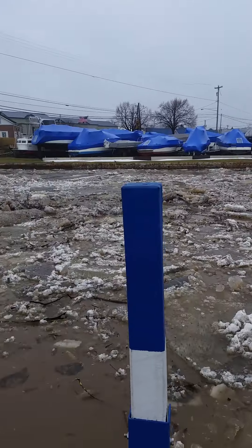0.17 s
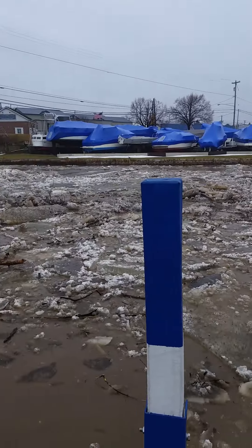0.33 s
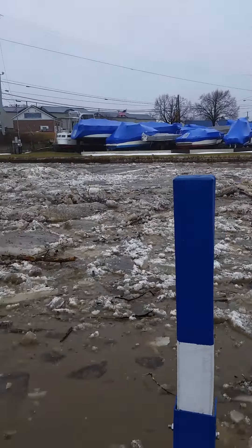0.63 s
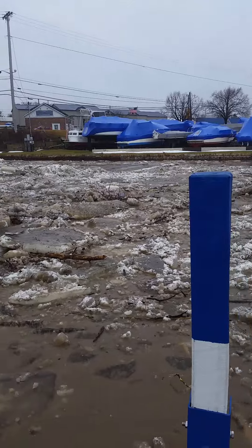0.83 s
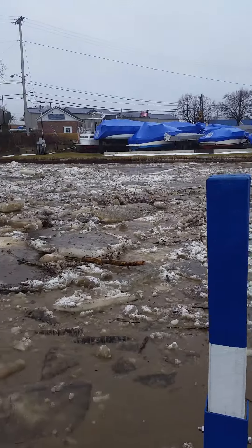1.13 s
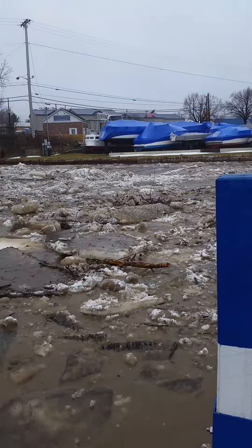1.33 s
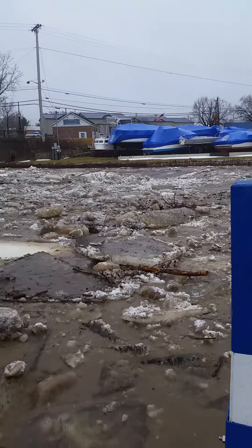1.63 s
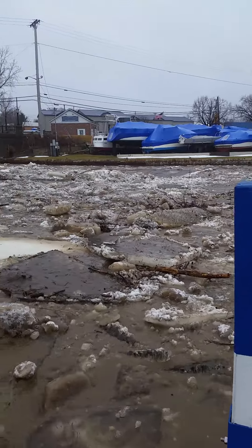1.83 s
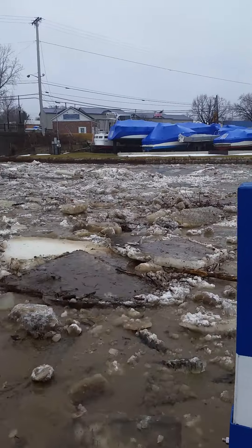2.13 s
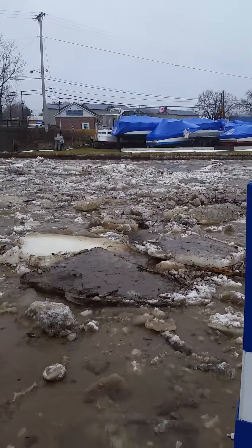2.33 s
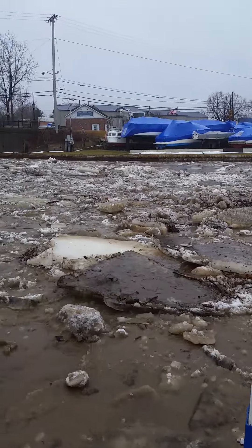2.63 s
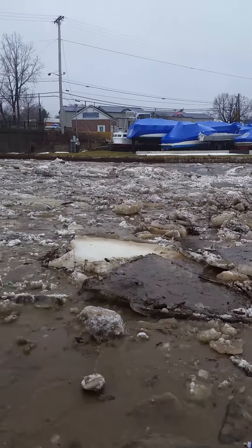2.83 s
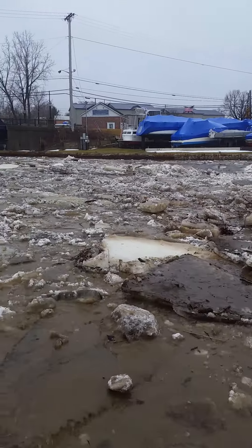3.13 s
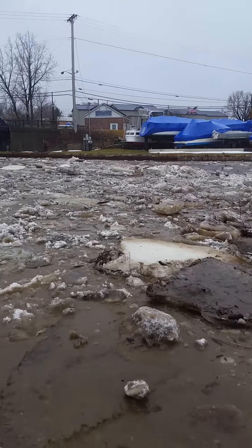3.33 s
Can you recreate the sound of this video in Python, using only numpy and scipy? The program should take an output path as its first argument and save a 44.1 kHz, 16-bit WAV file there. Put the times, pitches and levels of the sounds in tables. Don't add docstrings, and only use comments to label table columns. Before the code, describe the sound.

River ice drifting past with slushy hiss, ticks and a deep thud, under rumbling wind gusts

```python
import sys
import numpy as np
from scipy import signal
from scipy.fft import rfft, irfft, next_fast_len
from scipy.io import wavfile
from scipy.ndimage import uniform_filter1d

SR = 44100
rng = np.random.default_rng(int(sys.argv[2]) if len(sys.argv) > 2 else 0)


def amplitude_ratio(level_db):
    exponent = np.asarray(level_db, float) / 20
    return 10 ** exponent


def bounce(signal):
    frames = np.transpose(np.atleast_2d(signal))
    limited = np.clip(frames, -1, 1)
    pcm = np.round(limited * 32767).astype(np.int16)
    wavfile.write(sys.argv[1], SR, pcm)


N = 153909


def evened(x):
    return x / np.sqrt(np.mean(x ** 2) + 1e-20)


def read(points, hz):
    f, value = np.transpose(points)
    return np.interp(np.log(hz + 1), np.log(f + 1), value)


def curve(points, t):
    return np.interp(t, *np.transpose(points))


def add(mix, s, sound):
    part = mix[..., round(s * SR):][..., :sound.shape[-1]]
    part += sound[..., :part.shape[-1]]


def colour(x, points, lag_s=0.):
    size = next_fast_len(len(x) + 2048)
    hz = np.fft.rfftfreq(size, 1 / SR)
    delay = np.exp(-2j * np.pi * hz * lag_s)
    return irfft(rfft(x, size) * amplitude_ratio(read(points, hz)) * delay, size)[:len(x)]


def resonate(x, hz, width):
    r = np.exp(-np.pi * width / SR)
    return 2 * signal.lfilter([1 - r], [1, -r * np.exp(2j * np.pi * hz / SR)], x).real


def slow(seconds, count):
    span = max(int(seconds * SR), 1)
    smooth = uniform_filter1d(rng.standard_normal(count), span)
    return evened(uniform_filter1d(smooth, span))


# pitch in Hz, likeness (1 is identical).
LIKENESS = [(100, 0.7), (700, 0.84), (1500, 0.95), (3000, 0.77), (6000, 0.04), (15000, 0.092)]


def hiss():
    patch_db, flicker_db = 1.0, 1.5
    frames, hz = N // 64 + 5, np.fft.rfftfreq(256, 1 / SR)
    a, b, c, d, patches = rng.standard_normal((frames, 129, 5)).T
    patches = evened(uniform_filter1d(uniform_filter1d(patches, 5, 0), 40, 1))
    flicker = evened(uniform_filter1d(rng.standard_normal(frames), size=7))
    same = np.clip(read(LIKENESS, hz), -1, 1)[:, None]
    left = a + 1j * b
    right = same * left + np.sqrt(1 - same ** 2) * (c + 1j * d)
    z = np.array([left, right]) * amplitude_ratio(patch_db * patches + flicker_db * flicker)
    return evened(signal.istft(z, nperseg=256, noverlap=192)[1][:, :N])


def grains(per_s, low_hz, top_hz, cycles):
    spread_db = 3.6
    happens = rng.random(N) < per_s / SR
    size = amplitude_ratio(spread_db * np.minimum(rng.exponential(1, N), 3.5)) * happens
    kind, out = rng.integers(0, 24, N), np.zeros(N)
    for k, hz in enumerate(np.geomspace(low_hz, top_hz, 24)):
        u = np.arange(0, 4 * cycles * SR / hz) * hz / SR
        ring = np.sin(2 * np.pi * u) * np.exp(-u / cycles)
        out += signal.oaconvolve(size * (kind == k), ring)[:N]
    return evened(out)


# time in seconds, level in dB.
FLOW_LEVEL = [(0, -45), (.35, -43), (.6, -45), (1.1, -42), (1.44, -39.5), (1.52, -35.5), (1.7, -34.5),
              (1.95, -34), (2.15, -36.5), (2.6, -38), (2.9, -36), (3.49, -38)]
# pitch in Hz, level in dB per Hz.
RIVER_COLOUR = [(60, 8.5), (300, -3), (900, -6.5), (1700, -8.5), (3000, -13), (5000, -19.5), (9000, -18.5),
                (16000, -23)]


def river():
    level_db, crackle_db, clink_db = 3, -11, -11
    crackle = np.array([grains(900, 2320, 20000, cycles=1.0) for port in range(2)])
    body = hiss() + amplitude_ratio(crackle_db) * crackle
    body = evened(np.array([colour(x, RIVER_COLOUR) for x in body]))
    body = body + amplitude_ratio(clink_db) * grains(200, 337.6, 1800, cycles=6.0)
    return body * amplitude_ratio(level_db + curve(FLOW_LEVEL, np.arange(N) / SR))


# time in seconds, level in dB.
WIND_LEFT = [(0, -19), (.15, -33), (.5, -24), (.65, -34), (.9, -27), (1.2, -22.5), (1.35, -25),
             (1.6, -19.5), (1.8, -27.5), (2.1, -20), (2.4, -31), (2.6, -34.5), (2.9, -26.5), (3.1, -29.5),
             (3.49, -35)]
WIND_RIGHT = [(0, -7), (.2, -10), (.3, -16.5), (.45, -14), (.6, -14.5), (.75, -30), (.95, -23),
              (1.05, -12.5), (1.15, -18.5), (1.4, -16.5), (1.7, -16.5), (2.1, -14.5), (2.45, -20),
              (2.6, -21.5), (2.75, -34), (2.95, -31.5), (3.05, -23), (3.49, -26)]
# pitch in Hz, level in dB per Hz.
WIND_COLOUR = [(15, -36), (40, -10.5), (75, -0.5), (180, -4), (260, -6.5), (400, -21.5), (800, -32),
               (2000, -54)]


def wind_on_port(gust):
    full_db, dull_db_per_octave = -3, 0.73
    lump_db, lump_s = 1.5, 0.025
    frames, hz = N // 256 + 5, np.fft.rfftfreq(1024, 1 / SR)
    a, b = rng.standard_normal((frames, 513, 2)).T
    short_db = curve(gust, np.arange(frames) * 256 / SR) - full_db
    octaves = np.log2(np.maximum(hz, 100) / 100)[:, None]
    shape = amplitude_ratio(read(WIND_COLOUR, hz)[:, None] + dull_db_per_octave * octaves * short_db)
    x = signal.istft((a + 1j * b) * shape, nperseg=1024, noverlap=768)[1][:N]
    lumpy = evened(x) * amplitude_ratio(lump_db * np.tanh(slow(lump_s, N)))
    return evened(lumpy) * amplitude_ratio(curve(gust, np.arange(N) / SR))


def wind():
    return np.array([wind_on_port(WIND_LEFT), wind_on_port(WIND_RIGHT)])


# middle in seconds, peak level in dB, pitch in Hz, port (0 left, 1 right).
EDDIES = [(0.142, -9.5, 171, 0), (0.217, -11.5, 114, 0), (0.483, -16, 140, 0), (1.235, -24, 90, 0),
          (1.3, -9, 122, 0), (1.58, -8, 137, 0), (1.689, -14, 109, 0), (1.986, -12, 122, 0),
          (2.12, -29, 120, 0), (2.175, -8, 151, 0), (2.935, -11.5, 156, 0), (3.394, -8.5, 93.5, 1),
          (3.414, -12.5, 197, 1), (2.285, -4, 136, 1), (3.179, -12, 78, 1), (.007, 0, 160, 1),
          (.016, -3, 150, 1), (.074, -7.5, 118, 1), (0.101, -7.5, 188, 1), (0.166, -3, 75, 1),
          (0.388, -2.5, 124, 1), (0.421, -8, 172, 1), (0.438, -2.5, 148, 1), (.572, -8, 84, 1),
          (1.063, -4.5, 106, 1), (2.165, -9, 174, 1), (1.035, -4.5, 117, 1), (1.697, -4, 98, 1),
          (1.801, -2, 87, 1), (2.088, -2.5, 91, 1), (2.409, -5.5, 80, 1), (2.443, -6.5, 81, 1)]


def puffs():
    cycles = 0.55
    out, t = np.zeros((2, N)), np.arange(-1500, 1500) / SR
    for s, db, hz, port in EDDIES:
        push = np.exp(-(t * hz / cycles) ** 2) * np.cos(2 * np.pi * hz * t + 0.22)
        add(out[int(round(port))], s + t[0], amplitude_ratio(db) * push)
    return out


# start in
# seconds, peak level in dB, pitch in Hz, time to fade by 60 dB in seconds.
CHUNK_TAPS = [(.609, -35.5, 666, 0.14), (0.609, -35, 920, 0.12), (.611, -37, 1380, 0.096),
              (.748, -19.5, 244, 0.08), (.772, -25.5, 271, 0.072), (.875, -36.5, 675, .1),
              (1.097, -32, 1800, .03), (1.096, -34, 524, 0.11), (1.115, -30, 552, 0.11),
              (1.135, -23.5, 548, .1), (1.149, -23.5, 547.6, 0.15), (1.19, -27, 315, 0.059),
              (1.148, -24, 1010, 0.033), (1.474, -16.5, 581, 0.064), (1.476, -20.5, 3530, 0.051),
              (1.483, -22, 832, .07), (1.504, -11, 184, 0.059), (1.511, -21.5, 812, 0.096),
              (1.525, -26.5, 1210, .06), (1.574, -27, 1346, .04), (1.576, -29, 1887, 0.054),
              (1.859, -24, 1620, 0.032), (1.888, -31.5, 550, 0.095), (1.95, -23.5, 834, 0.053),
              (1.949, -23.5, 1300, 0.027), (1.98, -30, 840, 0.052), (1.997, -30, 580, .06),
              (2.075, -31, 850, 0.036), (2.102, -28, 940, 0.037), (2.121, -30, 1010, 0.046),
              (2.141, -24.5, 1073, 0.036), (2.3, -24, 1215, 0.04), (2.46, -39, 700, .05),
              (2.534, -28.5, 759, 0.064), (2.695, -36, 934, .04), (2.717, -39.5, 520, 0.049),
              (2.768, -37, 737, 0.061), (2.828, -25.5, 241, 0.1), (2.845, -32, 1100, .06),
              (2.959, -42, 1290, .04), (3.023, -33, 571, 0.13), (3.022, -28, 1160, 0.045),
              (3.135, -30, 850, 0.053), (3.247, -29.5, 536, 0.07), (3.343, -25, 717, 0.052)]


def taps():
    rise_s, rough_db = .0015, 3
    out, t = np.zeros(N), np.arange(8000) / SR
    for s, db, hz, t60 in CHUNK_TAPS:
        rough = rough_db * np.tanh(slow(1.14 / hz, len(t)))
        level = amplitude_ratio(db - 60 * t / t60 + rough) * (1 - np.exp(-t / rise_s))
        add(out, s, level * np.sin(2 * np.pi * hz * t))
    return out


# start in seconds, peak level in dB, centre pitch in Hz, width in Hz.
ICE_SNAPS = [(.075, -41, 8000, 2500), (.125, -32, 5500, 3000), (0.1344, -27.5, 6100, 4000),
             (.3651, -27, 14000, 2500), (.4344, -42, 8500, 4000), (.4933, -40, 15000, 4000),
             (.868, -44, 5000, 3000), (.9882, -33, 13100, 2000), (1.018, -30, 7860, 4000),
             (1.5115, -20, 12000, 8000), (1.6217, -20, 9000, 9000), (1.8208, -36, 14000, 6000),
             (2.2044, -24, 13000, 8000), (2.2648, -28, 13500, 5000), (2.4034, -31, 13000, 6000),
             (2.437, -25, 7150, 3000), (2.4673, -38, 13900, 5000), (2.534, -29, 11000, 3000),
             (2.6574, -33, 14000, 4950), (2.7555, -22, 9000, 9000), (2.8205, -48, 13500, 5000),
             (2.866, -18, 8600, 4000), (2.8863, -34, 14000, 5000), (2.9711, -23, 10800, 8000),
             (3.1572, -31, 13000, 5850), (3.2051, -26, 14000, 5000), (3.2809, -30, 13000, 5000),
             (3.4286, -30, 13500, 5000)]


def snaps():
    fade_s, trim_db = .0013, -3
    out, t = np.zeros(N), np.arange(400) / SR
    for s, db, hz, width in ICE_SNAPS:
        burst = rng.standard_normal(400) * np.exp(-t / fade_s)
        tick = resonate(resonate(burst, hz, width), hz, width)
        add(out, s, amplitude_ratio(db + trim_db) * tick / abs(tick).max())
    return out


def groan():
    start_s, rise_s, level_db = 3.17, 0.072, -28.5
    pitch_hz, wander_hz = 104.53, 4.94
    phase = 2 * np.pi * np.cumsum(pitch_hz + wander_hz * slow(.02, N)) / SR
    rub = evened(np.sin(phase) * amplitude_ratio(2.0 * slow(0.047, N)))
    return amplitude_ratio(level_db) * rub * np.clip((np.arange(N) / SR - start_s) / rise_s, 0, 1)


def thud():
    start_s, pitch_hz, level_db, t60_s, rise_s = 1.477, 177, -5.5, 0.113, 0.0049
    out, t = np.zeros(N), np.arange(N) / SR
    level = amplitude_ratio(level_db - 60 * t / t60_s) * (1 - np.exp(-t / rise_s))
    add(out, start_s, level * np.sin(2 * np.pi * pitch_hz * t))
    return out


# pitch as a multiple of the lowest, level in dB, width in Hz.
FLOE_RINGS = [(1.001, 17, 75), (1.39, 0, 110), (2.1, -14, 130), (3.3, -20, 160)]
# pitch in Hz, level in dB per Hz.
GRIND_COLOUR = [(100, 2), (500, 4), (2000, -2), (4000, -6), (6000, -14), (9000, -21.5), (16000, -26)]


def knock(db, length, hz, share):
    rise_s, tail_s = .004, .008
    dullness, full_db, spread = 0.97, -19, 0.78
    t = np.arange(0, .25, 1 / SR)
    shape = np.minimum(t / rise_s, 1) * np.exp(-np.maximum(t - length, 0) / tail_s)
    rough = amplitude_ratio(2.1 * slow(0.0011, len(t)) - 34 * t)
    both, left, right = shape * rng.standard_normal((3, len(t))) * rough
    ring = sum(amplitude_ratio(d) * resonate(both, hz * k, w) for k, d, w in FLOE_RINGS)
    dull_db = dullness * (db - full_db)
    dulled = [(f, d + dull_db * max(np.log2(f / 2000), 0)) for f, d in GRIND_COLOUR]
    crush = np.array([colour(both + spread * x, dulled) for x in (left, right)])
    share = np.clip(share, 0, 1)
    x = share * evened(ring) + (1 - share) * evened(crush)
    return amplitude_ratio(db - 6.0) * evened(x) * np.sqrt(np.mean(shape ** 2))


# start in seconds, peak level in dB, grind length in seconds,
# ring pitch in Hz, share of ring against crushing (0 to 1).
FLOE_KNOCKS = [(0.304, -30, 0.019, 1840, 0.12), (0.398, -33.5, 0.0081, 560, 0.17),
               (0.343, -30, 0.02, 580, 0.14), (0.606, -26, 0.012, 660, 0.092),
               (0.63, -31, 0.0092, 900, 0.05), (0.734, -33, 0.025, 594, 0.47),
               (1.093, -26.5, 0.0078, 550, 0.2), (1.112, -25.5, 0.027, 560, 0.089),
               (1.147, -26, 0.016, 550, 0.1), (1.462, -25.5, 0.0081, 596, 0.1),
               (1.474, -17.5, .016, 596, 0.1), (1.504, -18, 0.013, 810, 0.1),
               (1.567, -26, 0.012, 1333, 0.33), (1.991, -27, 0.016, 840, 0.2),
               (2.4, -23.5, 0.003, 1910, 0.25), (3.015, -31, 0.0091, 555, 0.2)]


def knocks():
    out = np.zeros((2, N))
    for s, *blow in FLOE_KNOCKS:
        add(out, s, knock(*blow))
    return out


# pitch in Hz, change in dB.
LEFT_COLOUR = [(300, 1.5), (1500, 0.5), (4800, -1), (6000, 0.5), (7200, 11), (8300, 2.5), (9500, -3),
               (16000, 7)]
RIGHT_COLOUR = [(300, 2.5), (1500, -6), (3200, -7), (4500, 0), (8200, -12), (10500, 1.5), (13000, 16.5),
                (15000, 22.5)]


def through_ports(air):
    left = colour(air[0], LEFT_COLOUR, lag_s=0.00011)
    return np.array([left, colour(air[1], RIGHT_COLOUR)])


def scene():
    air = river() + taps() + snaps() + groan() + thud() + knocks()
    return through_ports(air) + wind() + puffs()


def roll_off(x):
    return signal.sosfilt(signal.butter(12, 16170, fs=SR, output="sos"), x)


def record(dry):
    low_hz, top_hz, ceiling = 28, 15800, .95
    x = signal.sosfilt(signal.butter(2, low_hz, "high", fs=SR, output="sos"), dry)
    x = np.tanh(x / ceiling) * ceiling
    x = x * np.minimum(np.arange(N) / 150, 1)
    treble_cut = signal.firwin(1023, top_hz, window=("kaiser", 9), fs=SR)
    x = signal.oaconvolve(x, treble_cut[None], "same")
    return roll_off(x)


dry = scene()
out = record(dry)
bounce(out)
```